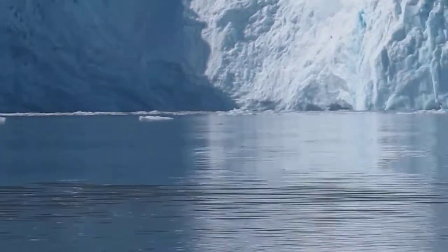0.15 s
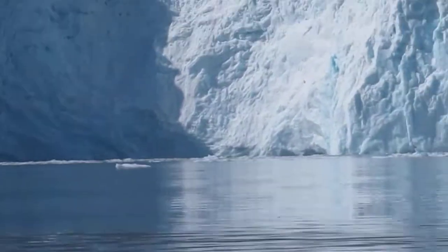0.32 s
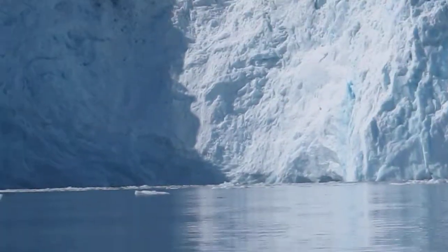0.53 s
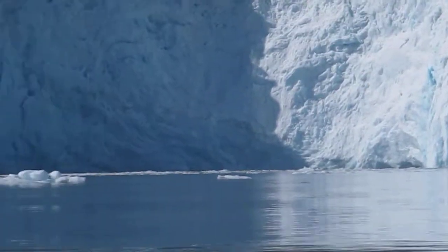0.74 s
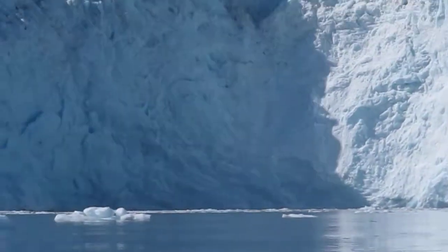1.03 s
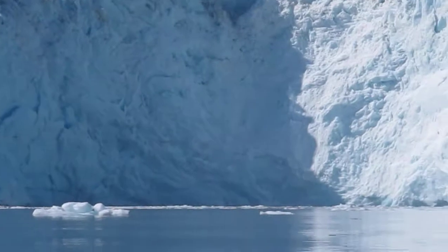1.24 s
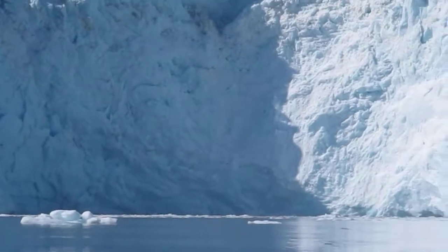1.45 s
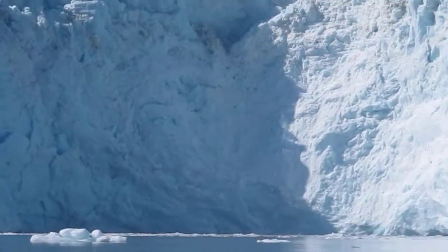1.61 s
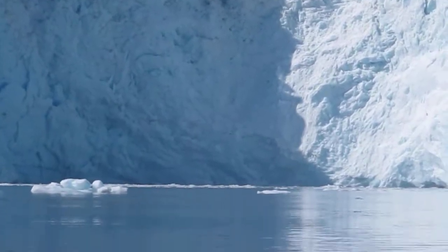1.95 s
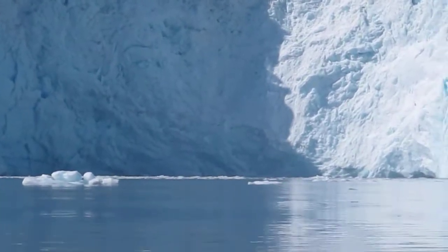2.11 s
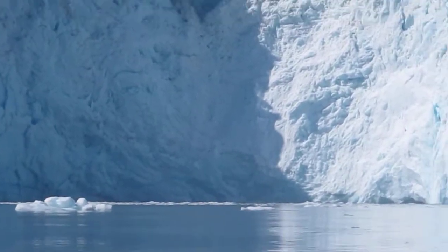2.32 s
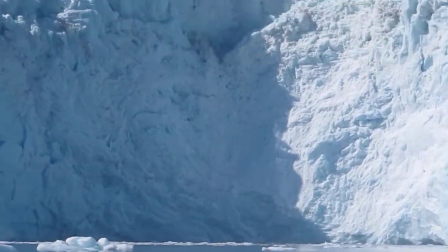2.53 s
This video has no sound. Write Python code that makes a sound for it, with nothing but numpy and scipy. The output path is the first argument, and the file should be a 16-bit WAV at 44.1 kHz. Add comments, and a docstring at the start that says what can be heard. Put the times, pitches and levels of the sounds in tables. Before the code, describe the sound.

Low thunder and blunt thuds of ice falling far off, with near splashes and crackling bubbles

```python
"""A glacier face collapses into the sea, heard from a boat far across calm water.
Shaped noise makes the fall's thunder, rumble and roar; windowed sines boom off the ice wall.
Behind lies a distant wash of filtered noise. Close by, a small wave slops and splashes, and air bubbles
pop and fizz in the icy water: decaying sines that rise in pitch. Low noise is wind on the microphone."""
import sys
import numpy as np
from scipy import signal
from scipy.fft import rfft, irfft
from scipy.io import wavfile

SR = 44100
rng = np.random.default_rng(int(sys.argv[2]) if len(sys.argv) > 2 else 0)


def unload_wav(signal):
    """Save mono or channel-first audio to the path in sys.argv[1] as 16-bit WAV at rate SR, clipped to [-1, 1]."""
    wavfile.write(
        sys.argv[1],
        SR,
        np.round(np.clip(np.atleast_2d(signal).T, -1, 1) * 32767).astype(np.int16),
    )


N = 119070
T = np.arange(N) / SR
HZ = np.fft.rfftfreq(N, 1 / SR)


def amp(db):
    """Decibels to gain."""
    return 10 ** (np.asarray(db) / 20)


def unit(x):
    """Scales to rms 1."""
    return x / np.sqrt(np.mean(x ** 2) + 1e-20)


def level(points):
    """Gain over time from (s, dB) points."""
    return amp(np.interp(T, *np.transpose(points)))


def read(points):
    """Joins a spectrum's (Hz, dB) points on a log-frequency axis."""
    f, value = np.transpose(points)
    return np.interp(np.log(HZ + 1), np.log(f), value)


def colour(x, points):
    """Filters by a spectrum, then scales to rms 1."""
    return unit(irfft(rfft(x) * amp(read(points)), N))


def add(mix, s, sound):
    """Mixes a sound in at time s, cut off at the end of the mix."""
    part = mix[..., max(round(s * SR), 0):][..., :sound.shape[-1]]
    part += sound[..., :part.shape[-1]]


def noise(side_db):
    """Stereo white noise; side_db sets its width."""
    mid, side = rng.standard_normal((2, N))
    return mid + amp(side_db) * np.array([side, -side])


def diffuse():
    """White noise from all around: alike at both ports in the bass, unrelated in the treble."""
    alike_below_hz = 1620
    left, other = rfft(rng.standard_normal((2, N)))
    same = 1 / (1 + (HZ / alike_below_hz) ** 2)
    right = same * left + np.sqrt(1 - same ** 2) * other
    return irfft(np.array([left, right]), N)


def flutter(rate_hz, depth_db):
    """A random gain of rms 1 that wanders up to about the given rate."""
    slow = irfft(rfft(rng.standard_normal(N)) / (1 + (HZ / rate_hz) ** 4), N)
    return unit(amp(depth_db * unit(slow)))


def panned(x, pan_db, lead_s):
    """Places a sound by its level (left minus right) and its lead at the left microphone port."""
    size = len(x) + 32
    hz = np.fft.rfftfreq(size, 1 / SR)
    sides = np.array([[.5], [-.5]])
    padded = np.pad(x, (8, 24))  # room for the time shift
    shift = np.exp(2j * np.pi * hz * sides * lead_s)
    return amp(sides * pan_db) * irfft(rfft(padded) * shift, size)


def chirp(hz, cycles, rise):
    """A bubble rings and climbs in pitch as it nears the surface."""
    attack_s = .00014
    t = np.arange(0, 6 * max(cycles, 1) / hz, 1 / SR)
    turns = hz * t
    swept = turns * (1 + abs(rise) * turns / 2)  # cycles so far, with the rise
    envelope = (1 - np.exp(-t / attack_s)) * np.exp(-swept / cycles)
    return envelope * np.sin(2 * np.pi * swept)


def swarm(per_s, low_hz, high_hz, cycles, spread_db, count):
    """A crowd of bubbles born at random, of count random sizes, each size from its own direction."""
    rise = .013  # share of pitch gained per cycle
    port_lag_s = .00016  # greatest difference in arrival time at the two ports
    out = np.zeros((2, N))
    for pitch, ring, pan, bearing in rng.random((count, 4)):
        hz = low_hz * (high_hz / low_hz) ** pitch
        born = rng.random(N) < per_s / count / SR
        births = born * amp(spread_db * np.minimum(rng.exponential(1, N), 3))
        single = chirp(hz, cycles * (.5 + ring), rise)
        bubble = panned(single, 10 * (pan - .5), port_lag_s * (2 * bearing - 1))
        out += signal.oaconvolve(births[None], bubble, axes=1)[:, :N] * hz  # higher pitch weighs more
    return unit(out)


def hull(x):
    """Adds quick reflections from the boat: sparse decaying echoes, different at each port."""
    total_db, decay_s = -11, .0024
    t = np.arange(1024) / SR
    sparse = rng.standard_normal((2, len(t))) * (rng.random((2, len(t))) < .15)
    taps = sparse * np.exp(-t / decay_s) * (t > .0006)
    taps *= amp(total_db) / np.linalg.norm(taps, axis=1, keepdims=True)
    return x + signal.oaconvolve(x, taps, axes=1)[:, :N]


def wash():
    """The hiss of distant churned water: diffuse noise with a slowly changing level."""
    # far wash: spectrum [f/Hz, relative level/dB]
    wash_colour = [(30, -24.5), (200, 1), (600, 16), (1100, 5.5), (1500, 5), (2100, 4.5), (3000, -10.5),
                   (4200, -37), (7000, -45.5), (9000, -21.5), (12000, -30.5), (16000, -41)]
    # far wash over time [t/s, level/dB]
    wash_level = [(0, -40), (.8, -40), (1.4, -39.5), (1.65, -43.5), (1.95, -41.5), (2.3, -40.5),
                  (2.7, -40.5)]
    return colour(diffuse(), wash_colour) * level(wash_level)


def wind():
    """Low buffeting at the microphone: noise unrelated at the two ports, with gusts shared by both."""
    # wind: spectrum [f/Hz, relative level/dB]
    wind_colour = [(4, -30.5), (16, -11), (30, 0.5), (60, -3), (120, -2.5), (250, -35.5), (600, -42),
                   (3000, -79.5)]
    # gusts [t/s, level/dB]
    wind_level = [(0, -36), (.17, -26.5), (.35, -31.5), (.62, -27), (.8, -28.5), (1, -31.5), (1.14, -21),
                  (1.3, -25), (1.48, -38.5), (1.8, -37.5), (2, -29.5), (2.18, -33.5), (2.35, -19),
                  (2.52, -33.5), (2.7, -34)]
    buffeting = colour(rng.standard_normal((2, N)), wind_colour)
    return buffeting * level(wind_level) * flutter(rate_hz=14, depth_db=5.5)


def fizz():
    """Tiny bubbles escape from melting ice: near ticks in a fine hiss."""
    # fizz: spectrum [f/Hz, relative level/dB]
    fizz_colour = [(1500, -25.5), (3200, -3), (4500, -6.5), (6500, -6), (7600, -7.5), (9000, -16),
                   (12000, -24), (16000, -32)]
    # fizz over time [t/s, level/dB]
    fizz_level = [(0, -35.5), (.1, -57.5), (.25, -47), (.33, -56), (.47, -45.5), (.7, -61), (.92, -40),
                  (1.1, -51), (1.25, -49.5), (1.58, -62), (1.8, -61), (2.03, -54.5), (2.25, -61),
                  (2.6, -68.5), (2.65, -43.5), (2.7, -59)]
    ticks = hull(swarm(per_s=400, low_hz=3100, high_hz=8200, cycles=1.2, spread_db=3, count=36))
    return colour(unit(ticks) + unit(diffuse()), fizz_colour) * level(fizz_level)


def gurgle():
    """Large bubbles that follow the wave under ring lower and slower than the fizz."""
    # large bubbles: spectrum [f/Hz, relative level/dB]
    gurgle_colour = [(350, -7.5), (650, -1), (1000, -9), (1400, -11.5), (2400, -12)]
    # large bubbles over time [t/s, level/dB]
    gurgle_level = [(0, -44), (.54, -47), (.62, -41), (.69, -37.5), (.78, -35), (.87, -41.5), (.98, -51),
                    (1.08, -41.5), (1.3, -36.5), (1.5, -81), (2.7, -88.5)]
    crowd = swarm(per_s=740, low_hz=553, high_hz=1640, cycles=3, spread_db=4, count=24)
    return colour(crowd, gurgle_colour) * level(gurgle_level)


def slop():
    """A small wave breaks beside the boat into ringing bubbles and fluttering noise for spray."""
    # slop: spectrum [f/Hz, relative level/dB]
    slop_colour = [(300, -3.5), (800, 5.5), (1200, 1), (2100, 1), (2900, -4), (5000, -5), (7000, -15.5),
                   (9000, -26.5), (12000, -28), (16000, -41.5)]
    # slop beside the boat [t/s, level/dB]
    slop_level = [(0, -28.5), (.03, -49), (.07, -49.5), (.2, -42), (.33, -46.5), (.44, -37.5),
                  (.475, -30.5), (.6, -32), (.7, -33.5), (.82, -36.5), (.93, -32.5), (1.03, -38),
                  (1.09, -42), (1.19, -47), (1.25, -38), (1.4, -48), (1.6, -67.5), (2.7, -47)]
    crowd = hull(swarm(per_s=2000, low_hz=904, high_hz=9940, cycles=4.5, spread_db=4.5, count=60))
    spray = diffuse() * flutter(rate_hz=74, depth_db=2.5)
    return colour(unit(crowd) + amp(-1.5) * unit(spray), slop_colour) * level(slop_level)


def splashes():
    """The wave folds over in short swells of crackling bubbles, each filtered around its own pitch."""
    # dense crunches of tiny bubbles [t/s, rms level at the crest/dB, time to the crest/s, f/Hz]
    crunches = [(.464, -27, 0.0045, 4600), (0.4935, -20, 0.0026, 3470), (0.496, -19, 0.0034, 1570),
                (0.511, -29.5, 0.0048, 2940), (.533, -34, 0.0054, 1770), (0.581, -33.5, 0.0067, 4400),
                (0.643, -33.5, 0.0055, 4070), (0.657, -37, 0.0016, 4870), (0.9198, -31, 0.0016, 6550),
                (0.925, -33, 0.0098, 4270), (1.024, -35, .006, 4670), (2.644, -43.5, 0.0084, 4930)]
    spread_octaves = .56
    out, t = np.zeros((2, N)), np.arange(4096) / SR
    octave = np.log2(np.fft.rfftfreq(len(t), 1 / SR) + 1)
    crackle = swarm(per_s=9000, low_hz=950, high_hz=9170, cycles=.69, spread_db=4, count=24)
    for s, db, crest_s, hz in crunches:
        band = 1 / (1 + ((octave - np.log2(hz)) / spread_octaves) ** 4)
        cut = crackle[:, round(s * SR):][:, :len(t)]
        burst = irfft(rfft(cut, len(t)) * band)
        swell = t / crest_s * np.exp(1 - t / crest_s)  # 1 at the crest
        add(out, s, amp(db) * unit(burst * swell) * np.sqrt(np.mean(swell ** 2)))
    return out


def pops():
    """The nearest bubbles and drops, each heard singly: rising chirps and short slaps of noise."""
    # drops slapping the surface [t/s, peak level before the hull's reflections/dB, decay/s]
    drops = [(.094, -30, 0.0036), (0.2433, -21, 0.0019), (0.3688, -30, 0.002), (.388, -27, 0.0023),
             (0.4138, -15, 0.0013), (.565, -25, 0.0013), (0.6125, -20, .0008), (1.085, -29, 0.00071),
             (1.117, -23, 0.0011), (1.1553, -18, 0.00083), (1.214, -25, .0017), (1.2177, -22.5, 0.00092),
             (1.235, -23, .001), (1.2999, -25.5, .0009), (1.7661, -32.5, 0.0022), (2.0505, -31, 0.00091),
             (2.6103, -22, 0.0011), (2.6383, -28, 0.0012)]
    # bubbles near the boat
    # [t/s, level before attack and decay/dB, f/Hz, ring/cycles, pitch gain/share per cycle, left minus right/dB]
    bubbles = [(.1052, -31, 2320, 6.5, .005, 7), (.1648, -28, 2050, 8.9, .007, 3),
               (.1868, -20.5, 4800, 7.3, 0.02, 0), (.248, -26.5, 4800, 6.3, 0.0055, 5),
               (0.4134, -18, 5290, 9.5, 0.0041, -8), (.414, -26.5, 2170, 11, .005, 9),
               (.44, -30, 6100, 9.2, .005, -7), (0.4774, -15.5, 2460, 7, .003, 0),
               (.4904, -15, 2200, 6, .003, 1), (0.497, -24, 1560, 3.8, 0.023, 13),
               (.502, -36, 1270, 4.4, 0.011, -2), (0.5076, -14, 2060, 9.1, 0.011, 2),
               (.536, -20, 1420, 7.3, .008, 0), (0.5531, -14, 1680, 4.6, 0.022, 3),
               (.5817, -22, 4830, 8, .005, 3), (0.587, -19, 4270, 6.4, .003, -7),
               (.602, -26.5, 1010, 9.4, 0.0053, 0), (0.632, -28, 1540, 9, 0.012, 0),
               (0.6462, -19, 3310, 5.5, .012, -3), (.662, -24, 770, 2.8, 0.0075, 9),
               (.68, -23.5, 885, 4.3, 0.0065, -3), (.697, -24, 1050, 6.2, .01, 0),
               (.855, -24.5, 748, 7.9, 0.0095, .5), (0.855, -23.5, 1140, 3.7, 0.0083, -5),
               (.872, -23, 846, 16, 0.0039, 0), (0.9007, -24, 2550, 4.9, 0.019, 5),
               (0.9206, -15.5, 6100, 5, .0035, 3), (0.968, -31, 1090, 10, 0.0039, -2),
               (0.983, -31, 2640, 7, .01, 1), (.984, -20.5, 5820, 8.4, 0.0071, 6),
               (1.0358, -18, 3400, 5.4, 0.008, -1), (1.1615, -28, 7450, 4.7, 0.0043, -6),
               (1.1901, -12, 6270, 2.7, 0.0045, -6), (1.2241, -22.5, 2160, 8, .003, 1),
               (1.621, -27, 4690, 6.4, 0.0023, -5.5), (1.6607, -36, 7150, 6.1, 0.0043, 2),
               (1.828, -33, 6400, 4.5, .006, -4.5), (1.9546, -37, 3840, 7.3, .011, 2),
               (1.9714, -36, 2340, 8.8, .011, 2), (1.9802, -26, 5770, 6.5, 0.011, -1),
               (2.0548, -34, 2640, 23, 0.057, 1), (2.071, -36, 4900, 9, .007, -4),
               (2.113, -20, 3570, 13.5, 0.063, 4), (2.191, -38, 7500, 8.5, .005, -2.5),
               (2.4428, -17.5, 4710, 5.2, 0.014, -8.5), (2.6102, -1.5, 4960, 3, 0.0041, -4.5),
               (2.663, -30.5, 4660, 10, .006, 8)]
    # where the bubbling is [t/s, lead at the left port/microseconds]
    bearings = [(.25, 46), (.42, -10), (.58, -44), (.86, 0), (.92, 44), (1.6, 70)]
    out, t = np.zeros((2, N)), np.arange(900) / SR
    band = signal.butter(3, (1400, 6600), "band", fs=SR, output="sos")
    hiss = diffuse()
    for s, db, decay_s in drops:
        burst = hiss[:, round(s * SR):][:, :len(t)] * np.exp(-t / decay_s)
        slap = signal.sosfilt(band, burst)
        add(out, s, amp(db) * slap / abs(slap).max())
    for s, db, hz, cycles, rise, pan_db in bubbles:
        lead_us = np.interp(s, *np.transpose(bearings))
        add(out, s, panned(amp(db) * chirp(hz, cycles, rise), pan_db, lead_us / 10 ** 6))
    return hull(out)


def booms():
    """Each block hits the sea with one blunt pressure wave, scattered by the ice wall."""
    # blocks of ice hitting the sea [t/s, level before the bell window/dB, f/Hz, width/cycles]
    blocks = [(0.2132, -14.5, 157, 0.58), (.615, -10.5, 162, 0.49), (0.691, -20.5, 500, 1.16),
              (0.723, -21, 200, .5), (0.914, -7, 126, 0.62), (0.9444, 4, 200, 0.38),
              (0.9845, -7.5, 229, 0.57), (1.222, -9, 115, 0.3), (1.275, -7.5, 144, 1.16),
              (1.298, -9.5, 114.4, 0.66), (1.33, -9, 167, 1.4), (1.339, -15.5, 152, 0.38),
              (1.359, -10, 89.7, 0.65), (1.399, -1.5, 101, .9), (1.5351, -0.5, 153, .35),
              (1.553, -8.5, 366, 1.18), (1.561, 2.5, 174, 0.48), (1.625, -10, 274, 1.36),
              (1.644, -7, 227, 0.39), (1.668, -7, 92.5, 0.51)]
    echo_db, echo_s = -11.5, .014  # level relative to the wave, decay
    out, t = np.zeros(N), np.arange(-.03, .2, 1 / SR)
    for s, db, hz, cycles in blocks:
        wave = np.sin(2 * np.pi * hz * t) * np.exp(-(hz * t / cycles) ** 2 / 2)
        scatter = rng.standard_normal(len(t)) * np.exp(-(t - t[0]) / echo_s)
        echo = signal.fftconvolve(wave, scatter)[:len(t)]
        add(out, s + t[0], amp(db) * (wave + amp(echo_db) * unit(echo) * wave.std()))
    return out


def collapse():
    """Tumbling ice far away: low thunder, a lumpy rumble and a roar of crumbling pieces, all shaped noise."""
    # lowest thunder: spectrum [f/Hz, relative level/dB]
    thunder_colour = [(5, -55.5), (20, -21.5), (38, 25.5), (62, 20), (85, -10), (130, -25.5), (400, -63),
                      (1500, -110)]
    # lowest thunder, which lingers after the fall [t/s, level before the 6 dB cut/dB]
    thunder_level = [(0, -32), (.2, -26.5), (.55, -26), (.8, -40), (.95, -36), (1.18, -32), (1.35, -16.5),
                     (1.55, -19), (1.75, -15), (2, -18), (2.25, -25.5), (2.45, -25), (2.7, -38.5)]
    # deep rumble: spectrum [f/Hz, relative level/dB]
    rumble_colour = [(5, -58), (45, -27), (65, -0.5), (80, 2.5), (105, 2.5), (175, 0), (260, -8),
                     (340, -16.5), (600, -45), (3000, -100)]
    # deep rumble over time [t/s, level before the 1 dB cut/dB]
    rumble_level = [(0, -31), (.23, -23.5), (.4, -24.5), (.57, -23.5), (.62, -17), (.78, -18), (.86, -18.5),
                    (.95, -17.5), (1.03, -22), (1.19, -24.5), (1.25, -14), (1.39, -9), (1.44, -17),
                    (1.52, -11.5), (1.6, -17), (1.72, -15.5), (1.9, -17), (2.05, -23.5), (2.3, -26.5),
                    (2.7, -26.5)]
    # roar of falling ice, pitched above the rumble: spectrum [f/Hz, relative level/dB]
    roar_colour = [(30, -53), (100, -36), (220, 4.5), (320, 3), (480, 0), (650, -9.5), (900, -25.5),
                   (1500, -34), (4000, -52), (12000, -83)]
    # roar over time [t/s, level/dB]
    roar_level = [(0, -34), (.3, -30), (.58, -32), (.75, -22.5), (.85, -31.5), (.95, -23), (1.08, -34.5),
                  (1.2, -31.5), (1.3, -29), (1.48, -27), (1.55, -19.5), (1.59, -33), (1.64, -23.5),
                  (1.7, -32.5), (1.9, -32), (2.2, -34.5), (2.7, -34.5)]
    pieces_per_s = 700
    thunder = colour(noise(side_db=-23.5), thunder_colour) * level(thunder_level)
    deep = colour(noise(side_db=-32), rumble_colour) * level(rumble_level)
    deep *= flutter(rate_hz=24, depth_db=1.5)
    pieces = rng.standard_normal(N) * (rng.random(N) < pieces_per_s / SR)
    crumbling = unit(pieces) + amp(-3) * noise(side_db=-14.5)
    roar = colour(crumbling, roar_colour) * level(roar_level)
    roar *= flutter(rate_hz=19, depth_db=.5)
    return amp(-6) * thunder + amp(-1) * deep + roar


def scene():
    """Wind and far wash, near water, then the falling ice."""
    background = wash() + wind()
    near_water = fizz() + gurgle() + slop() + splashes() + pops()
    return background + near_water + booms() + collapse()


def limiter(x):
    """Turns each channel down at once, in small steps, when it overloads; the gain recovers steadily."""
    ceiling, step_db, recovery_db_per_s = .94, .35, 150
    over_db = 20 * np.log10(np.maximum(abs(x) / ceiling, 1))
    stepped_db = np.ceil(over_db / step_db) * step_db
    recovery = recovery_db_per_s * T
    held_db = np.maximum.accumulate(stepped_db + recovery, axis=1) - recovery
    return x * amp(-held_db)


def record(dry):
    """Fades the ends, colours the two microphone ports, limits overloads and cuts the top treble."""
    # colour difference of the microphone ports [f/Hz, left minus right/dB]
    ports = [(30, -1.5), (250, -0.5), (1000, 0), (2000, 0.5), (3500, 5), (5000, 6), (6000, 1), (7000, -13),
             (9000, -5.5), (11000, -6.5), (14000, 1.5)]
    soft_ends = np.minimum(np.minimum(T, T[::-1]) / .003, 1)  # 3 ms fades
    port_gain = amp(np.outer([.5, -.5], read(ports)))
    heard = irfft(rfft(dry * soft_ends) * port_gain, N)
    treble_cut = signal.firwin(511, 15830, window=("kaiser", 9), fs=SR)  # Hz
    return signal.oaconvolve(limiter(heard), treble_cut[None], "same")


dry = scene()
out = record(dry)
unload_wav(out)
```